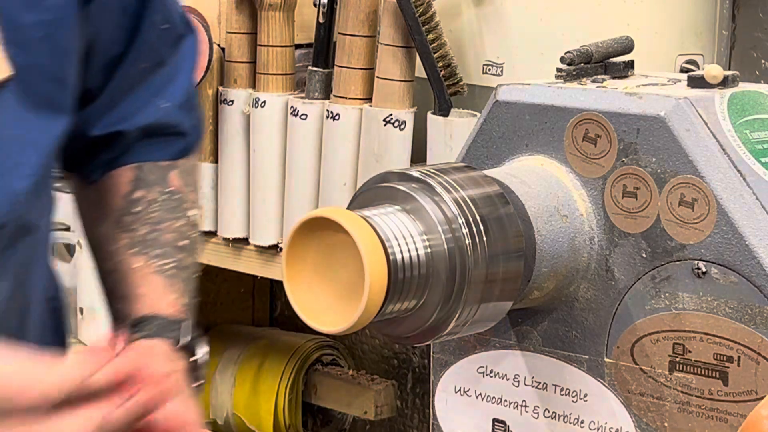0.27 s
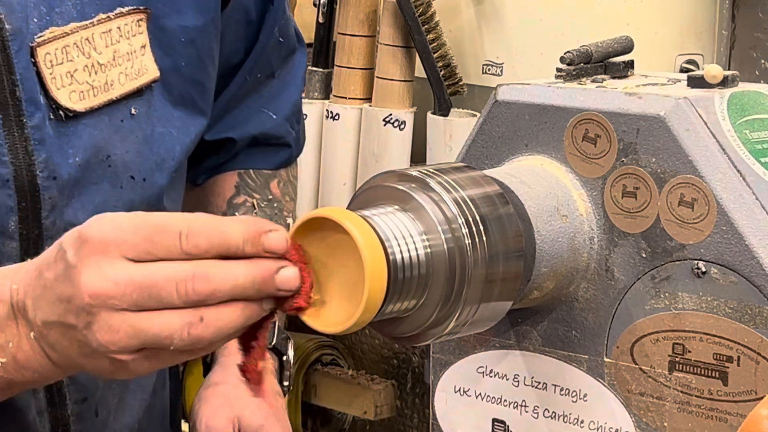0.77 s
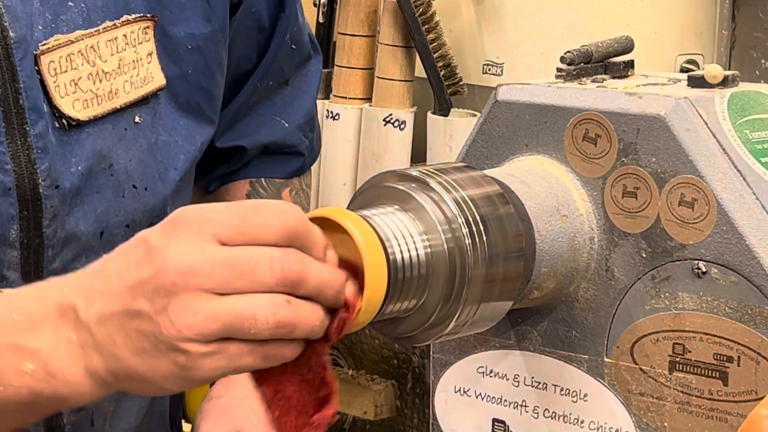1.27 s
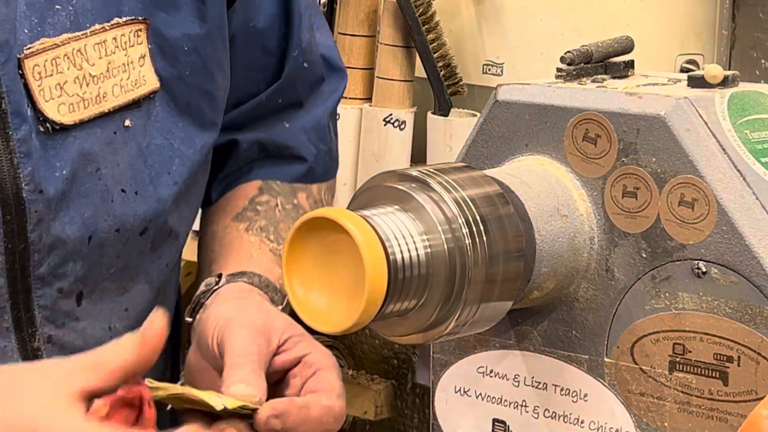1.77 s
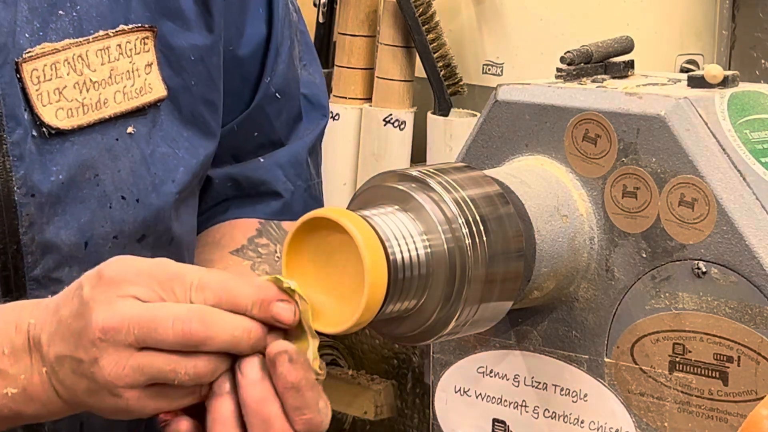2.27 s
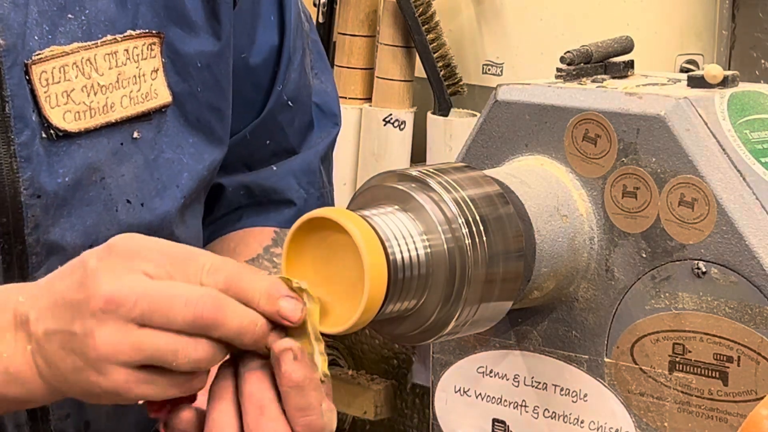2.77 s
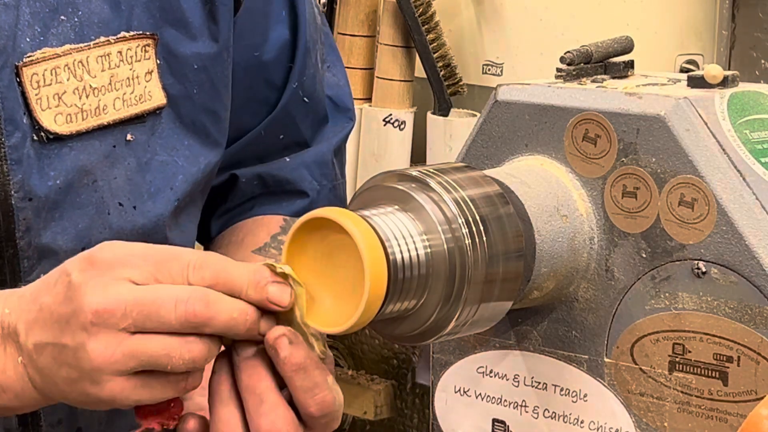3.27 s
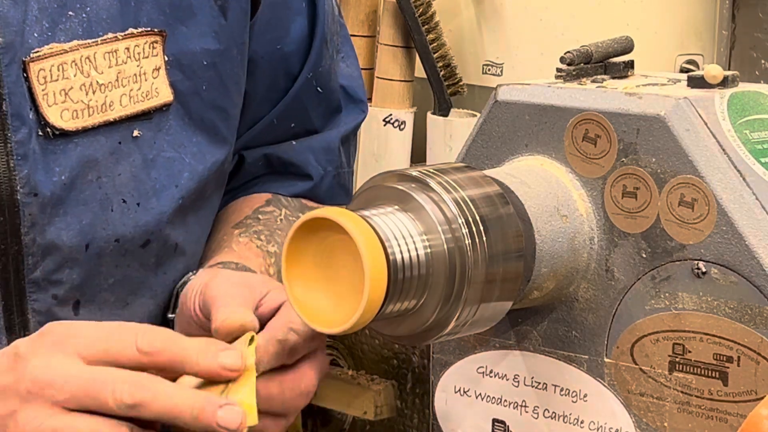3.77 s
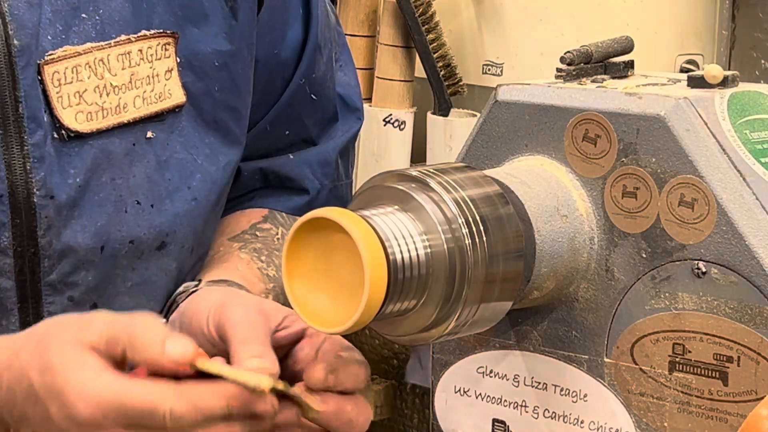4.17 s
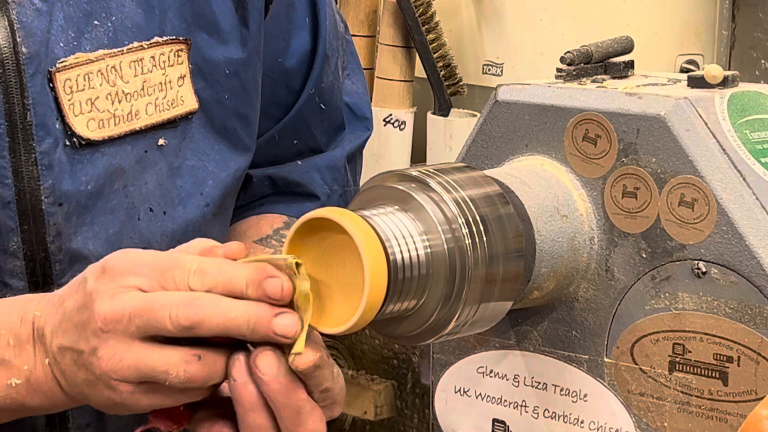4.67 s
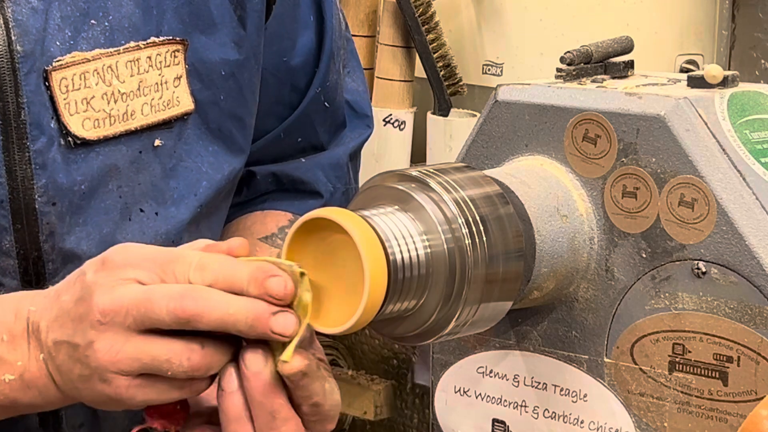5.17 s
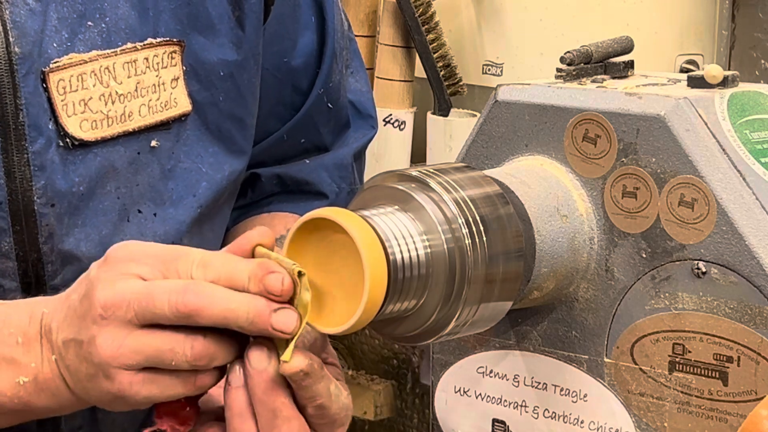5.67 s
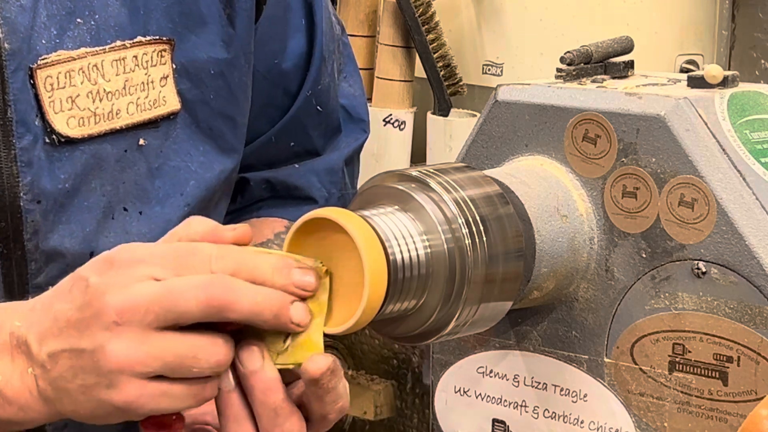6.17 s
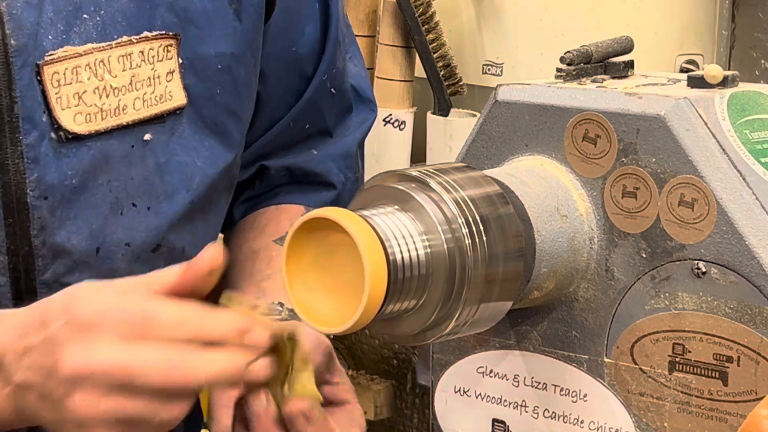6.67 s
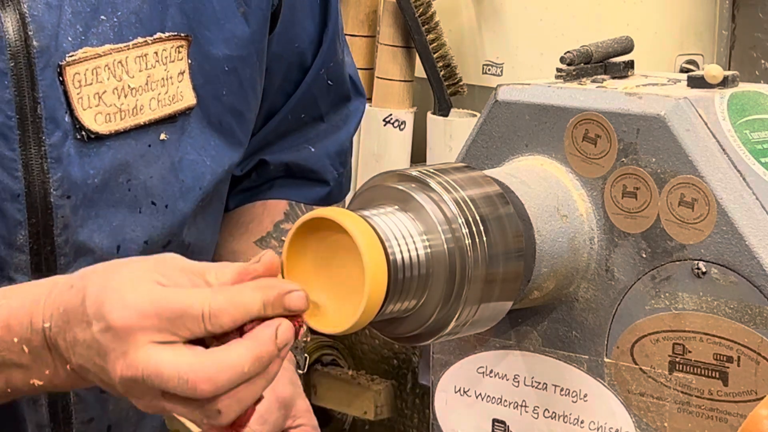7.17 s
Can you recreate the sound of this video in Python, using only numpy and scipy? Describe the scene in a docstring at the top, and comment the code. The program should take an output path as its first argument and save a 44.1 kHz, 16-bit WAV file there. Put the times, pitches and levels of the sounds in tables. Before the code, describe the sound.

A running wood lathe fills a workshop with steady layered humming, airy rush and a thin pulsing whine. After faint high squeaks and a soft pad wipe on the small spinning cup, sandpaper makes two brighter hissing passes with slight ringing and rasping catches, separated by short gaps of bare motor noise. A light touch begins at the end. Close stereo pickup.

```python
"""Wood lathe and sanding

A wood lathe spins a small cup in a workshop, heard by a close pair of microphone ports.
A worker steps in, wipes the cup with a pad, sands its rim in two hissing passes and touches it lightly at the end.
The touches are shaped noise that rings with the cup and throbs with each spindle turn.
Motor, belt and bearings hum as many thin tones, with a beeping whine, faint squeaks and a rush of coloured noise."""
import sys
import numpy as np
from scipy import signal
from scipy.io import wavfile
from scipy.ndimage import uniform_filter1d

SR = 44100
rng = np.random.default_rng(int(sys.argv[2]) if len(sys.argv) > 2 else 0)


def unload_wav(signal):
    """Save mono or channel-first audio to the path in sys.argv[1] as 16-bit WAV at rate SR, clipped to [-1, 1]."""
    wavfile.write(
        sys.argv[1],
        SR,
        np.round(np.clip(np.atleast_2d(signal).T, -1, 1) * 32767).astype(np.int16),
    )


def linear_from_db(decibels):
    """Turn decibels (scalar or array-like) into linear amplitude factors; 0 gives 1."""
    return 10 ** (np.asarray(decibels, float) / 20)


N = 326340
SIZE, HOP = 512, 128  # noise frame and step, samples
FRAMES = N // HOP + 5
SETTLE_S = 0.92  # the worker moves in and shades or reflects the tones

# Touches of pad or paper, one list each, from landing to lifting.
# Each row: time in seconds, pressure as the base level of the hiss above 8 kHz in dB.
TOUCHES = [
    [(0.36, -60), (0.436, -47.5), (0.706, -45.5), (1.082, -55), (1.122, -67), (1.138, -62), (1.448, -42),
     (1.47, -58)],
    [(2.066, -50), (2.076, -39), (2.142, -42), (2.188, -33), (2.316, -39.5), (2.66, -42.5), (2.93, -39),
     (3.126, -38.5), (3.148, -32.5), (3.226, -38.5), (3.37, -36), (3.395, -43)],
    [(4.34, -56), (4.37, -42), (4.42, -35.5), (4.62, -33.5), (4.68, -38), (4.91, -35), (5.55, -41.5),
     (5.63, -36.5), (5.64, -40), (5.85, -43.5), (5.98, -37.5), (6.4, -41), (6.44, -34.5), (6.49, -39.5),
     (6.54, -35), (6.57, -49)],
    [(7.04, -67), (7.044, -58), (7.068, -52), (7.399, -47.5)],
]
# Colour of the grit hiss. Each row: frequency in Hz, relative level in dB.
GRIT_COLOUR = [(1200, -46), (2800, -5), (3600, -9), (5300, -7.5), (5900, 1), (7000, -3.5), (8500, 0.5),
               (10400, -1), (11500, 1), (12800, -2.5), (14200, 2.5), (15300, -4.5), (15700, -46)]
# Low rasp of the cup wall. One row: frequency in Hz, width in Hz.
WALL_RASP = (2080, 450)
# Pitch of the hollow as the fingers cover more or less of its mouth. Each row: time in seconds, pitch in Hz.
HOLLOW_PITCH = [(.5, 4580), (2.1, 4500), (2.4, 4500), (3.1, 4620), (3.38, 4400), (4.4, 4450), (4.65, 4650),
                (5.8, 4500), (6.03, 4450), (6.3, 4670), (6.55, 4470)]
# The paper catches and the cup rings out.
# Each row: middle in seconds, length in seconds, extra ring in dB, extra rasp in dB.
CATCHES = [(2.1, 0.087, 5.5, 0), (2.19, .1, 3.5, 0), (3.094, 0.089, 6, 7), (4.4, .1, 2.5, 0),
           (5.05, .2, 1, 3), (6.047, .12, 7, 12), (6.175, 0.23, 4, 9), (6.54, .06, 2, 2)]
# End grain passing the paper. Each row: times a turn, depth from 0 to 1.
END_GRAIN = [(1, .06), (2, .07), (4, .04)]
SPINDLE_HZ = 42.3
LAND_S = .008  # fade at landing and lifting
HOLLOW_WIDTH_HZ = 970
FIRM_DB = -37.5  # firm pressure, where ring and rasp have their base levels
RING_DB, RING_DB_PER_DB = -4, -0.1  # against the hiss; the ring grows more slowly than the pressure
RASP_DB, RASP_DB_PER_DB = -16, -0.1


def sanding(patchy_db=2.33, flicker_db=0.72):
    """Grit hisses on the rim; the cup rings with it and the grain throbs with each turn."""
    hz = np.fft.rfftfreq(SIZE, 1 / SR)
    t = np.arange(FRAMES) * HOP / SR
    grit = linear_from_db(2 * read(GRIT_COLOUR, hz))
    grit /= grit[hz > 8000].sum()
    rasp = bell(hz, *WALL_RASP) ** 2
    rasp /= rasp.sum()
    hollow_hz = np.interp(t, *np.transpose(HOLLOW_PITCH))
    hollow = bell(hz[:, None], hollow_hz, HOLLOW_WIDTH_HZ) ** 2
    hollow /= hollow.sum(0)
    catch_ring_db, catch_rasp_db = sum(np.outer(db, swell(t, s, length)) for s, length, *db in CATCHES)

    power = np.zeros((len(hz), FRAMES))
    for rows in TOUCHES:
        s, db = np.transpose(rows)
        pressure_db = np.interp(t, s, db)
        over_firm_db = pressure_db - FIRM_DB
        ring_db = RING_DB + RING_DB_PER_DB * over_firm_db + catch_ring_db
        rasp_db = RASP_DB + RASP_DB_PER_DB * over_firm_db + catch_rasp_db
        fade = np.clip(np.minimum(t - s[0], s[-1] - t) / LAND_S, 0, 1)
        contact = fade * linear_from_db(2 * pressure_db)
        ring = hollow * linear_from_db(2 * ring_db) + np.outer(rasp, linear_from_db(2 * rasp_db))
        power += (grit[:, None] + ring) * contact

    grain_db = patchy_db * patches(8.6, 13) + flicker_db * patches(200, 2.4)
    gain = np.sqrt(power * 4 / 3) * linear_from_db(grain_db[:len(hz)])
    hiss = stereo_noise(SIZE, HOP, gain)
    turns = 2 * np.pi * SPINDLE_HZ * np.arange(N) / SR
    return hiss * (1 + sum(depth * np.cos(k * turns + k) for k, depth in END_GRAIN))


# How the shop carries a tone. Each row: frequency in Hz, extra level in dB before the worker stands
# by the headstock, left over right in dB, lead of the right port in radians.
SHOP_PATHS = [(125, 0, 1, -.2), (156, 1, 11, .4), (271, 0, 1, -.1), (334, 1, -3, .1), (393, -1, -1, .6),
              (525, -6, 4, .5), (560, 2, -2, -.1), (604, -6, -4, -.4), (640, 0, 1, -.1), (724, 1, 1, .2),
              (805, 11, 3, .8), (867, 3, 3, .4), (970, -1, 7, .2), (1024, -11, 2, .3), (1191, 4, 10, .6),
              (1208, -21, -9, -2.3), (1225, 4, -1, .7), (1309, -4, 5, .7), (1392, 4, -6, 1.1),
              (1594, 2, -8, 2.1), (1630, -1, -10, .8), (1776, 0, 0, -.1), (4500, -3, 0, 0),
              (9900, -3, 0, 3.1)]
# Tones around one pitch are louder until a moment, then fall away.
# One row: frequency in Hz, width in Hz, whole fall in dB, middle of the fall in seconds, fall time in seconds.
SHADED_TONES = (1610, 100, 5.5, 4.6, 0.86)
WAVER_DB, WAVER_HZ = 1.5, 5  # rms depth and fastest rate


def hum():
    """Thin tones of motor, belt and bearings; each wavers and reaches the ports at its own angle."""
    slow = np.arange(0, N, HOP) / SR  # block starts
    fine = np.arange(HOP) / SR  # time within a block
    out = np.zeros((2, N))
    rates = np.geomspace(WAVER_HZ / 10, WAVER_HZ, num=6)
    path_hz, *paths = np.transpose(SHOP_PATHS)
    clock = motor_clock(slow)
    unsettled = np.exp(-(slow / SETTLE_S) ** 2 / 2)
    shade_hz, width, fall_db, s, fall_s = SHADED_TONES
    shade_db = -fall_db * np.tanh((slow - s) / fall_s) / 2
    tones = drive_tones()
    for (hz, db, follows), draw in zip(tones, rng.random((len(tones), 7))):
        early_db, pan_db, lead = (np.interp(hz, path_hz, column) for column in paths)
        waver = evened(np.sin(2 * np.pi * (np.outer(slow, rates) + draw[1:])).sum(1))
        level_db = db + early_db * unsettled + WAVER_DB * waver
        level = linear_from_db(level_db + shade_db * bell(hz, shade_hz, width))
        turns = hz * (clock if follows else slow) + draw[0]
        blocks = 2 * level * np.exp(2j * np.pi * turns)  # level and angle at each block start
        share = 1 / (1 + linear_from_db(-2 * pan_db))  # part of the power on the left
        for port, part, angle in ((0, share, 0), (1, 1 - share, lead)):
            within = np.sqrt(part) * np.exp(2j * np.pi * hz * fine + 1j * angle)
            out[port] += np.outer(blocks, within).real.ravel()[:N]
    return out


# Pulley tones. Each row: multiple of the shaft speed, base level in dB rms.
PULLEY_TONES = [(6, -57), (7.5, -49), (8, -65), (10, -65), (13, -43), (14, -59), (15, -62), (16, -55),
                (18, -56), (22.5, -62), (26, -59), (27, -60), (31, -62), (32, -60), (39, -60)]
# Other steady tones, perhaps belt and bearings. Each row: frequency in Hz, base level in dB rms.
BEARING_TONES = [(393.1, -53), (525.3, -47), (557.7, -56), (569, -56), (639.6, -46), (724.4, -54),
                 (866.9, -45), (951.7, -53), (1071.2, -58), (1094.2, -59), (1233.9, -59), (1279, -56),
                 (1573.1, -53), (1633.5, -53), (1776, -56), (1874.6, -58), (2685, -59), (2769.6, -56),
                 (2776.7, -59), (2900.5, -57), (4445.3, -61), (9912.6, -64), (10262.8, -59)]
# Motor tones, with side tones one motor turn away.
# Each row: multiple of the magnetic pull, side as -1, 0 or 1, base level in dB rms.
MOTOR_TONES = [(4, -1, -59), (4, 0, -58), (4, 1, -56), (6, 0, -54), (6, 1, -53), (7, -1, -53), (7, 0, -58),
               (8, -1, -64), (8, 0, -46), (8, 1, -56), (9, -1, -57), (9, 0, -56), (10, -1, -53),
               (10, 0, -60), (10, 1, -55), (11, 0, -58), (12, -1, -51), (12, 0, -54), (12, 1, -53),
               (13, 0, -53), (14, -1, -47), (15, 1, -60), (16, -1, -44), (16, 1, -55), (18, 1, -55),
               (22, -1, -62), (22, 1, -59), (23, -1, -60), (23, 0, -59), (25, -1, -62), (40, 1, -62)]
SHAFT_HZ = 20.865  # a pulley shaft turning
FIELD_HZ, MOTOR_HZ = 100.66, 17.17  # magnetic pull and motor turns, both at mean motor speed


def drive_tones():
    """All hum tones as (Hz, dB rms, follows the motor speed): shaft and motor multiples and lone pitches."""
    pulley = [(k * SHAFT_HZ, db, False) for k, db in PULLEY_TONES]
    bearing = [(hz, db, False) for hz, db in BEARING_TONES]
    motor = [(k * FIELD_HZ + side * MOTOR_HZ, db, True) for k, side, db in MOTOR_TONES]
    return pulley + bearing + motor


IDLE_SPEED, SAG, SAG_LAG_S = 1.0009, .0015, .2  # shares of the mean speed: running free, lost under a touch


def motor_clock(t):
    """Time as the motor counts it: it sags while pad or paper presses on the cup."""
    step = t[1] - t[0]
    touching = sum((t > rows[0][0]) & (t < rows[-1][0]) for rows in TOUCHES)
    keep = np.exp(-step / SAG_LAG_S)
    load = signal.lfilter([1 - keep], [1, -keep], touching)
    return np.cumsum(IDLE_SPEED - SAG * load) * step


# Motor whine that throbs once a motor turn.
# Each row: time in seconds, then centre tone, lower side tone and upper side tone in dB rms.
WHINE_LEVELS = [(0, -57, -58, -47), (1.6, -65, -54, -52), (2.3, -54, -49, -53.5), (4.4, -54, -52, -46.5),
                (7.4, -45.5, -54, -48)]
WHINE_MULTIPLE = 24  # times the magnetic pull
THROB_S = 6.005  # time of one throb, when the three tones line up


def whine():
    """A tone with two side tones in step, so that it beeps once a motor turn; alike in both ports."""
    t = np.arange(N) / SR
    clock = motor_clock(t)
    clock = clock - clock[round(THROB_S * SR)]
    s, *levels_db = np.transpose(WHINE_LEVELS)
    out = np.zeros(N)
    for side, db in zip((0, -1, 1), levels_db):
        hz = WHINE_MULTIPLE * FIELD_HZ + side * MOTOR_HZ
        out += np.sqrt(2) * linear_from_db(np.interp(t, s, db)) * np.cos(2 * np.pi * hz * clock)
    return out


# Faint squeaks on one pitch, perhaps a bearing.
# Each row: middle in seconds, level at the top of the swell in dB rms, length in seconds.
SQUEAKS = [(.165, -48.5, .13), (.545, -48.5, .13), (.74, -53, .07), (.92, -55, .08), (1.52, -55, .12)]
SQUEAK_HZ = 4046


def squeaks():
    """Short swells of one thin sine tone, alike in both ports."""
    t = np.arange(N) / SR
    level = sum(linear_from_db(db) * swell(t, s, length) for s, db, length in SQUEAKS)
    return np.sqrt(2) * level * np.sin(2 * np.pi * SQUEAK_HZ * t)


# Rush of the drive. Each row: frequency in Hz, base level in dB per Hz.
RUSH_COLOUR = [(25, -100), (50, -75), (170, -75.5), (310, -71.5), (750, -69), (1100, -72), (2000, -72.5),
               (2400, -74), (3500, -79.5), (4500, -77.5), (7000, -82.5), (7600, -84.5), (12500, -90),
               (14500, -89.5), (15700, -99)]
# Casing resonances in the rush. Each row: frequency in Hz, width in Hz, boost or cut in dB.
CASING = [(407, 140, -2), (685, 220, 1.5), (1387, 158, 11), (1441, 59, -13.5), (1593, 29, 4),
          (2012, 34, 7.5), (2245, 150, -4.5), (2816, 280, 3.5), (3050, 80, -1), (3434, 53, 10.5),
          (3515, 153, -8), (3850, 28, 3), (4060, 48, 8), (4700, 530, 1.5), (5020, 120, -4.5),
          (5210, 54, 9.5), (5250, 100, -9), (5940, 78, 7), (6810, 87, 7.5), (7050, 80, 2.5),
          (11900, 230, 2), (12800, 500, 1.5)]
# Rush before the worker settles. Each row: frequency in Hz, extra level in dB.
RUSH_EARLY = [(200, 0.5), (800, 0), (1600, 0), (3000, 1)]


def rush(patchy_db=.8):
    """Air and bearing noise coloured by the casing."""
    size, hop = 8 * SIZE, 8 * HOP  # long frames resolve the narrow resonances
    hz = np.fft.rfftfreq(size, 1 / SR)
    t = np.arange(N // hop + 5) * hop / SR
    colour_db = read(RUSH_COLOUR, hz) + sum(db * bell(hz, f, width) for f, width, db in CASING)
    early_db = np.outer(read(RUSH_EARLY, hz), np.exp(-(t / SETTLE_S) ** 2 / 2))
    drift = rng.standard_normal((len(t), len(hz))).T
    drift = evened(uniform_filter1d(uniform_filter1d(drift, 40, 0), 6, 1))
    per_bin = np.sqrt(SR / size * 4 / 3)  # power per Hz to the height of a bin
    return stereo_noise(size, hop, per_bin * linear_from_db(colour_db[:, None] + early_db + patchy_db * drift))


# Stereo spread of the noise. Each row: frequency in Hz, likeness of left and right from 0 to 1,
# phase lead of the right in radians, left over right in dB.
STEREO_SPREAD = [(40, .99, 0, 0), (130, .95, 0, 2), (400, .6, .5, 1), (1000, .7, .2, 0),
                 (1400, .56, 1.2, -3), (1550, .4, 2.1, -5), (1700, .55, -.3, -3), (2000, .88, -.2, 0),
                 (2200, .985, 0, 0), (2800, .975, -.1, 0), (3500, .995, 0, 0), (5200, .995, 0, 0),
                 (5500, .88, .5, 0), (6150, .88, .6, 0), (6400, .995, 0, 0), (7650, .99, .1, 0),
                 (8000, .8, 1, 0), (8800, .75, 2.2, 0), (9250, .99, 3.1, 0), (10600, .99, 3.2, 0),
                 (11000, .75, 4.2, 0), (11600, .8, 5.1, 0), (12000, .99, 6.2, 0), (13600, .99, 6.3, 0),
                 (14000, .8, 7.4, 0), (14700, .75, 8.6, 0), (15050, .985, 9.4, 0)]


def stereo_noise(size, hop, gain):
    """Noise with the given bins x frames gain, spread over left and right: partly alike, turned and panned."""
    hz = np.fft.rfftfreq(size, 1 / SR)
    f, same, lead, pan_db = np.transpose(STEREO_SPREAD)
    same = np.clip(np.interp(hz, f, same), 0, 1)[:, None]
    turn = np.exp(1j * np.interp(hz, f, lead))[:, None]
    pan = linear_from_db(np.interp(hz, f, pan_db) / 2)[:, None]
    a, b, c, d = rng.standard_normal((gain.shape[1], len(hz), 4)).T
    left = a + 1j * b
    right = (same * left + np.sqrt(1 - same ** 2) * (c + 1j * d)) * turn
    spectra = np.array([left * pan, right / pan]) * gain
    return signal.istft(spectra, nperseg=size, noverlap=size - hop)[1][:, :N]


def patches(bins, frames):
    """Random field over frequency and time, smooth over the given spans."""
    field = rng.standard_normal((FRAMES, SIZE)).T
    return evened(uniform_filter1d(uniform_filter1d(field, int(bins), 0), int(frames), 1))


def evened(x):
    """Scales to rms 1."""
    return x / np.sqrt(np.mean(np.abs(x) ** 2) + 1e-20)


def read(points, hz):
    """Straight lines on a log-frequency axis."""
    f, value = np.transpose(points)
    return np.interp(np.log(hz + 1), np.log(f + 1), value)


def bell(hz, centre_hz, width):
    """Shape of one resonance, 1 at its centre and half at the edges of its width."""
    return 1 / (1 + (2 * (hz - centre_hz) / width) ** 2)


def swell(t, s, length):
    """One smooth hump of height 1 centred on s."""
    return np.cos(np.pi * np.clip((t - s) / length, -.5, .5))


def scene():
    """Drive hum, whine, squeaks and rush under the sanding."""
    return hum() + whine() + squeaks() + rush() + sanding()


def low_pass(x):
    """Removes everything above the highest recorded frequency."""
    return signal.sosfilt(signal.butter(12, 15680, fs=SR, output="sos"), x)


def record(dry):
    """Hands on the finished two-channel mix."""
    return low_pass(dry)


dry = scene()
out = record(dry)
unload_wav(out)
```